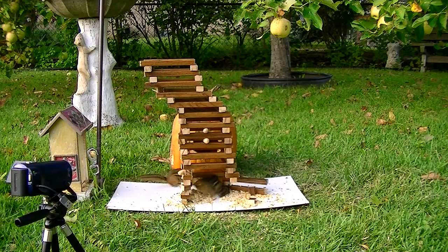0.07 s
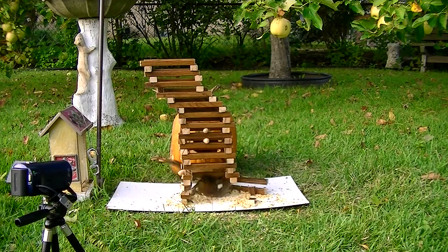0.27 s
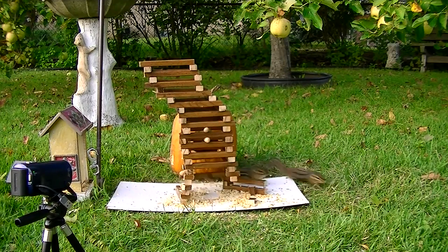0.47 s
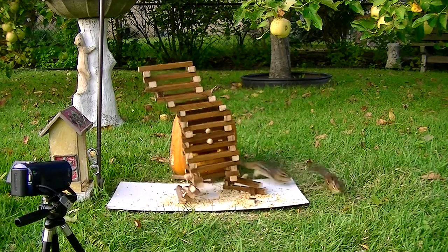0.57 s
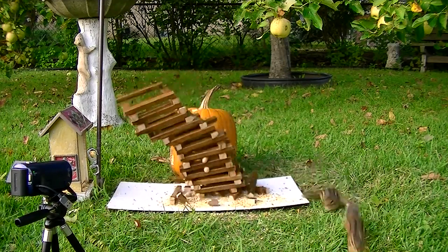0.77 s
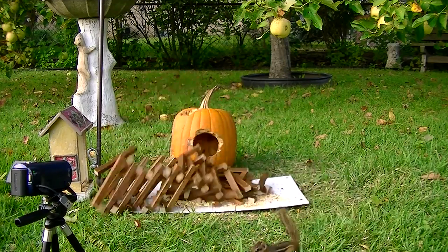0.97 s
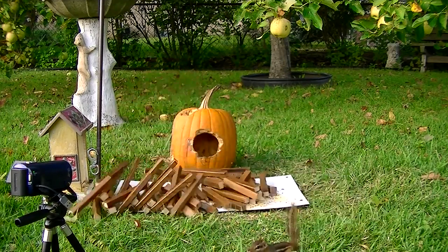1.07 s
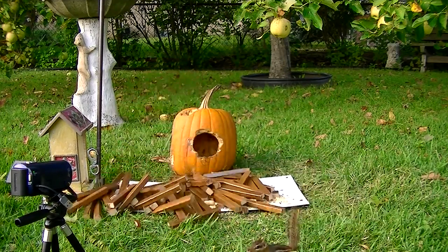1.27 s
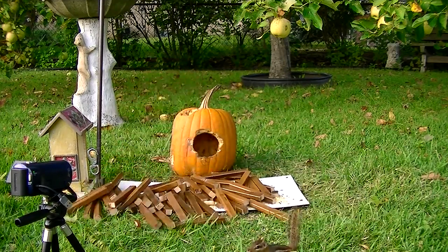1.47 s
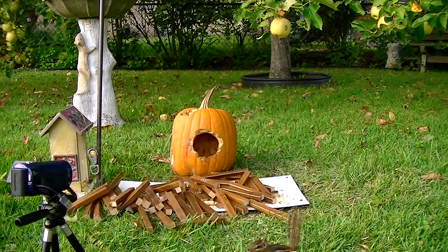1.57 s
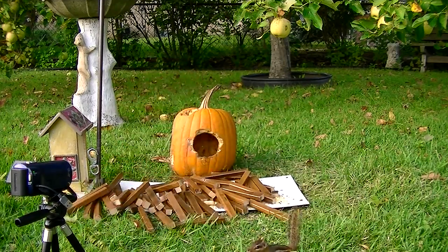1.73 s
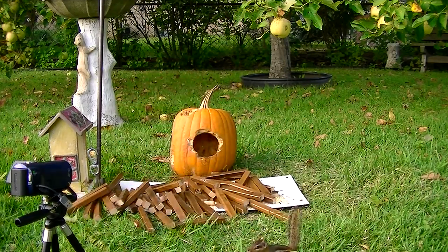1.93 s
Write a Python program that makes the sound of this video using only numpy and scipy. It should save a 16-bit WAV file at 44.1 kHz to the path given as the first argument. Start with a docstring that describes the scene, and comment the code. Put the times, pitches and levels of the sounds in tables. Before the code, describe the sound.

Wooden blocks clatter as a tower collapses on a lawn. Squirrels first scrabble through dry grass, then the blocks tumble densely, knocking and clinking, and settle in scattered knocks. The sound is slightly hollow over a faint outdoor hush.

```python
"""A dry rustle, then a dense wooden clatter that settles knock by knock.
Squirrels scrabble out from under a tower of wooden blocks on a lawn, and the tower topples.
Blocks knock on a board and on each other, clink as free bars and thump the ground.
A faint outdoor hush lies behind; one very short echo gives everything a hollow colour."""
import sys
import numpy as np
from scipy import signal
from scipy.fft import rfft, irfft
from scipy.io import wavfile

SR = 44100
rng = np.random.default_rng(int(sys.argv[2]) if len(sys.argv) > 2 else 0)


def file_out(sig):
    """Save sig as 16-bit WAV at sys.argv[1]."""
    # one column per channel
    cols = np.atleast_2d(sig).T
    # limit, then scale
    lim = np.clip(cols, -1, 1)
    pcm = np.round(lim * 32767).astype(np.int16)
    wavfile.write(sys.argv[1], SR, pcm)


N = 88200
T = np.arange(N) / SR
RING_T = np.arange(SR // 10) / SR

# Blocks landing. Each row: start in seconds, then thud, knock and crack levels in relative dB.
LANDINGS = [(0.381,-20.5,-20,-70),(0.428,-27.5,-33,-35),(0.466,-18.5,-28,-33.5),(.592,-32,-18.5,-57),(0.619,-30.5,-34,-48),(.677,-14.5,-27,-37),(0.685,-16,-21.5,-28),(.698,-18,-26,-18.5),(.709,-25,-57,-16.5),(.757,-23.5,-19.5,-36),(.765,-24,-22,-21.5),(.779,-42,-40,-23.5),(.790,-28,-31,-23.5),(0.832,-57,-32,-22),(0.867,-18,-21,-28.5),(.894,-40,-26.5,-21.5),(0.951,-43,-24.5,-27.5),(0.964,-21.5,-31,-41),(.977,-24,-37,-27.5),(0.985,-25,-19.5,-20),(.993,-36,-47,-12.5),(1.012,-24.5,-15.5,-28),(1.021,-26,-22,-19),(1.040,-31,-23,-24),(1.050,-18.5,-27,-24),(1.057,-38,-42,-18),(1.071,-57,-43,-15),(1.109,-69,-32,-36),(1.14,-56,-19,-23.5),(1.164,-31.5,-28.5,-37),(1.179,-35.5,-25.5,-28.5),(1.221,-25.5,-33,-31),(1.253,-27,-36,-26.5),(1.296,-28,-35,-30.5),(1.313,-27.5,-27,-61),(1.475,-35,-23.5,-71),(1.488,-55,-40,-24),(1.492,-24.5,-19.5,-28),(1.553,-33,-31,-62),(1.568,-22,-16.5,-41),(1.602,-17,-27,-40.5),(1.611,-32,-22.5,-38),(1.635,-21.5,-23,-49),(1.650,-34.5,-33,-44),(1.699,-30,-17.5,-28),(1.755,-38,-24,-48)]
# The tumbling mass. Each row: time in seconds, then knocking and ringing levels in relative dB.
TUMBLE_LEVELS = [(0.299,-44.5,-64),(.385,-31,-40),(.45,-36.5,-59),(.54,-48,-70),(0.671,-34.5,-39),(0.703,-16.5,-27.5),(0.739,-56,-27.5),(0.773,-23,-22),(.81,-42,-37),(.90,-33.5,-28.5),(.94,-34,-35.5),(1.0,-37,-26),(1.053,-19.5,-20),(1.15,-33.5,-23),(1.25,-30.5,-32.5),(1.319,-34.5,-32),(1.37,-38,-37.5),(1.44,-37,-41.5),(1.50,-34,-36),(1.57,-33,-40.5)]
# Spectrum of dry grass and leaves. Each row: frequency in Hz, level in dB.
GRASS_SPECTRUM = [(80,-40),(250,-6.5),(900,-10.5),(2500,-11),(4000,-13.5),(5500,-6.5),(7000,-14.5),(9500,-0.5),(12500,3),(14500,-6.5),(16500,-20.5)]

def from_db(db):
    """Decibels to gain."""
    return 10 ** (np.asarray(db) / 20)

def unit_rms(x):
    """Scale to unit rms."""
    return x / np.sqrt(np.mean(x ** 2) + 1e-20)

def curves(rows):
    """Interpolate each column after the time column, per sample."""
    times_s, *columns = np.transpose(rows)
    return [np.interp(T, times_s, column) for column in columns]

def coloured(x, spectrum):
    """Filter by (Hz, dB) points; unit rms."""
    hz, db = np.transpose(spectrum)
    grid_hz = np.linspace(1, SR / 2, N // 2 + 1)
    gain = from_db(np.interp(np.log(grid_hz), np.log(hz), db))
    return unit_rms(irfft(rfft(x) * gain, N))

def butter(x, hz, kind, order=2):
    """Butterworth filter."""
    return signal.sosfilt(signal.butter(order, hz, kind, fs=SR, output="sos"), x)

def low_noise(top_hz, n=N):
    """Low-passed noise; unit rms."""
    return unit_rms(butter(rng.standard_normal(n), top_hz, "low"))

def impulses(per_s, n=N):
    """True at random instants."""
    return rng.random(n) < per_s / SR

def decay(t60_s, t=RING_T):
    """Fall by 60 dB in t60_s."""
    return np.exp(-np.log(1000) * t / t60_s)

def add(out, start_s, sound):
    """Mix a sound in at start_s."""
    i = int(np.clip(start_s * SR, 0, N - 1))
    out[i:i + len(sound)] += sound[:N - i]

def mode(hz, db, t60_s):
    """One struck resonance."""
    return from_db(db) * np.sin(2 * np.pi * min(hz, SR / 2) * RING_T) * decay(t60_s)

def contact(ring, rebound, rebounds_per_s=1800):
    """One blow and a dying run of tiny rebounds share the energy of the ring."""
    n = len(RING_T)
    touches = impulses(rebounds_per_s, n) * rng.normal(0, rebound, n) * decay(t60_s=0.037)
    touches[0] = 1
    sound = signal.fftconvolve(touches, ring)[:n]
    return sound * np.linalg.norm(ring) / np.linalg.norm(sound)

def knock(bands_db, bands_hz=(444, 1280, 5700), detune=0.0593, spread_db=0.96):
    """A block damped by the pile: short modes, a little different at each blow."""
    # Each row: frequency in Hz, relative level in dB, T60 in seconds.
    pile_modes = [(313,-6.5,0.031),(402,-1.5,0.029),(549,1,0.024),(813,4,0.012),(1029,1,0.014),(1280,-0.5,0.015),(1552,0,0.015),(1852,-2.5,0.024),(2372,-4.5,0.028),(3220,-2,0.017),(4420,-6,.012),(5080,-2,0.0089),(5904,-8,0.034),(8030,-5.5,0.016),(10250,-4.5,0.025)]
    ring = np.zeros(len(RING_T))
    for k, (hz, db, t60_s) in enumerate(pile_modes):
        struck_hz = hz * (1 + detune * rng.normal())
        blow_db = np.interp(np.log(hz), np.log(bands_hz), bands_db) + rng.normal(0, spread_db)
        ring += (-1) ** k * mode(struck_hz, db + blow_db, t60_s)
    return contact(ring, rebound=0.2)

def clink(hz, overtone_db, detune=0.025):
    """A block ringing as a free bar: a bending mode and its overtones."""
    # Each row: frequency ratio, relative level in dB, T60 in seconds.
    bar_modes = [(1,-0.5,0.052),(1.9,-14,0.018),(2.37,-4.5,0.053),(3.95,-13,0.032)]
    ring = np.zeros(len(RING_T))
    for ratio, db, t60_s in bar_modes:
        is_overtone = ratio > 1
        mode_hz = hz * ratio * (1 + is_overtone * detune * rng.normal())
        ring += mode(mode_hz, db + is_overtone * overtone_db, t60_s)
    return contact(ring, rebound=0.075)

def blocks(knock_gain_db=2, clink_gain_db=-2):
    """Loud single contacts: blocks land, loose ones ring."""
    # Each row: start in seconds, relative level in dB, pitch in Hz, overtone gain in dB.
    clinks = [(0.593,-25.5,3020,-13),(.645,-24,2660,-16),(0.702,-27,2600,6),(.721,-32,2350,3),(0.764,-25,2590,10.5),(0.785,-29,2417,10.5),(0.833,-20.5,2345,-9),(.893,-24,2200,-1),(0.913,-23.5,2476,-5),(.952,-26.5,2730,4.5),(0.978,-27,2380,-13),(1.013,-13.5,2556,-2),(1.041,-15.5,2390,-15),(1.062,-16,2736,0),(1.086,-23,2637,9.5),(1.109,-18,3270,4.5),(1.115,-15.5,2610,-1.5),(1.14,-14,2816,-34),(1.146,-16.5,2457,-0.5),(1.180,-14.5,3360,-17),(1.212,-19.5,2390,-8),(1.231,-16.5,2593,-23),(1.253,-15.5,2681,0.5),(1.283,-26,3520,-25),(1.314,-22.5,2430,-16),(1.335,-28,3440,-42),(1.374,-30.5,3150,-22),(1.388,-17,3370,-21),(1.417,-22,2573,-8),(1.399,-24.5,4730,-11),(1.442,-21.5,2600,-10.5),(1.471,-26,2640,-35),(1.488,-18.5,2534,0),(1.511,-24.5,2670,-34),(1.552,-27.5,3367,-27),(1.700,-27.5,2690,-18),(1.7567,-23.5,2370,-18),(1.861,-31.5,2420,-35)]
    out = np.zeros(N)
    for start_s, *bands_db in LANDINGS:
        add(out, start_s, from_db(knock_gain_db) * knock(bands_db))
    for start_s, db, hz, overtone_db in clinks:
        add(out, start_s, from_db(db + clink_gain_db) * clink(hz, overtone_db))
    return out

def tumble(knocks_per_s=400, clinks_per_s=320, spread_db=1.5, detune=0.0304):
    """Many small random contacts while the tower shifts and falls."""
    # Each entry: a block's first bending mode in Hz.
    pitches_hz = [2104,2344,2462,2720,2662,2859,2974,3364]
    knocks, clinks = np.zeros((2, N))
    start_s, end_s = TUMBLE_LEVELS[0][0], TUMBLE_LEVELS[-1][0]
    dull_bands_db = np.array([0, 0, -17])
    for slot_s in np.arange(start_s, end_s, 1 / knocks_per_s):
        hit_s = slot_s + rng.random() / knocks_per_s
        add(knocks, hit_s, rng.choice([-1, 1]) * knock(dull_bands_db + rng.normal(0, spread_db)))
    for slot_s in np.arange(start_s, end_s, 1 / clinks_per_s):
        hz = rng.choice(pitches_hz) * (1 + detune * rng.normal())
        hit_s = slot_s + rng.random() / clinks_per_s
        add(clinks, hit_s, from_db(rng.normal(0, spread_db)) * clink(hz, overtone_db=-11))
    knock_db, clink_db = curves(TUMBLE_LEVELS)
    return from_db(knock_db - 7) * unit_rms(knocks) + from_db(clink_db - 6.5) * unit_rms(clinks)

def scuffs(scuff_gain_db=-6, grit_gain_db=-12):
    """Edges scuff as they land; fine clicks fill the tumble."""
    # Each row: frequency in Hz, level in dB.
    scuff_spectrum = [(800,-10.5),(2600,4),(3900,-0.5),(5800,4.5),(7200,-10.5),(10500,-4.5),(13000,-10),(16500,-25)]
    envelope = np.zeros(N)
    for start_s, _, _, crack_db in LANDINGS:
        add(envelope, start_s, from_db(crack_db + scuff_gain_db) * decay(t60_s=0.049))
    _, ringing_db = curves(TUMBLE_LEVELS)
    envelope += from_db(ringing_db + grit_gain_db) * (T < TUMBLE_LEVELS[-1][0])
    grit = impulses(per_s=12000) * rng.standard_normal(N)
    return envelope * coloured(grit, scuff_spectrum)

def rustle(gain_db=0.5, grain_spread_db=3, clump_db=2.5):
    """Dry grass and leaves crackle: clumps of bright grains, scrabbling strokes, a few snaps."""
    # Each row: time in seconds, relative level in dB.
    rustle_levels = [(0,-53),(.05,-46),(.14,-42.5),(.205,-40.5),(.285,-37.5),(.302,-41),(.345,-33),(.40,-30.5),(.50,-28),(.545,-35),(.60,-31),(.64,-42),(.72,-25),(.75,-39.5),(.785,-37),(.82,-46.5),(.835,-40),(.93,-49),(1.0,-44),(1.08,-36),(1.19,-46),(1.45,-69),(1.6,-52),(1.8,-66)]
    # Strokes that swell and stop. Each row: start in seconds, length in seconds, final level in dB.
    strokes = [(0.147,0.024,-44),(0.21,0.019,-29),(0.23,0.025,-26.5),(0.272,.021,-23.5),(0.475,.018,-25),(.524,.009,-21),(0.613,0.011,-25),(0.718,0.0059,-25),(1.063,0.02,-27.5)]
    # Each row: start in seconds, level in dB, T60 in seconds.
    snaps = [(0.273,-11,0.0056),(.315,-24.5,0.045),(0.327,-18.5,0.0092),(0.3639,-21.5,0.011),(0.394,-14.5,0.007),(.411,-20,.006),(0.473,-14,0.012),(0.516,-22,.008),(0.597,-17.5,0.0089),(0.612,-31,.006),(1.111,-16,0.014),(1.143,-26,.01),(1.541,-31.5,0.0059),(1.593,-32,.008),(1.638,-30.5,.008),(1.680,-30.5,0.014)]
    grains = impulses(per_s=5000) * rng.choice([-1, 1], N)
    grains = grains * from_db(grain_spread_db * np.minimum(rng.exponential(1, N), 4))
    level_db, = curves(rustle_levels)
    envelope = from_db(level_db + gain_db + clump_db * low_noise(top_hz=90))
    for start_s, length_s, db in strokes:
        add(envelope, start_s, from_db(db) * np.linspace(0.13, 1, int(length_s * SR)))
    snap_envelope = np.zeros(N)
    for start_s, db, t60_s in snaps:
        add(snap_envelope, start_s, from_db(db) * decay(t60_s))
    snapping = snap_envelope * coloured(rng.standard_normal(N), GRASS_SPECTRUM)
    return envelope * coloured(grains, GRASS_SPECTRUM) + snapping

def ground_thumps(top_hz=134):
    """Soft low thumps where the weight comes down."""
    # Each row: start in seconds, level in dB.
    thumps = [(0.675,-41.5),(0.766,-53),(.868,-58),(.98,-51),(1.048,-59),(1.488,-61),(1.57,-59)]
    out = np.zeros(N)
    for start_s, db in thumps:
        add(out, start_s, from_db(db) * low_noise(top_hz, len(RING_T)) * decay(t60_s=0.1))
    return out

def groan(roughness=0.63):
    """A block drags as the base gives way: a short, low, sinking tone."""
    # Each row: time in seconds, pitch in Hz, level in dB.
    drag = [(.525,253,-44),(.545,237,-41.5),(.575,222,-41),(.592,208,-47),(.61,180,-56)]
    hz, db = curves(drag)
    waver = 1 + roughness * low_noise(top_hz=63)
    dragging = (T > drag[0][0]) & (T < drag[-1][0])
    return from_db(db) * waver * np.sin(2 * np.pi * np.cumsum(hz) / SR) * dragging

def grass_ticks(gain_db=-39.5, end_s=1.75):
    """Stray faint ticks of dry grass."""
    onsets = impulses(per_s=70) * rng.uniform(0.3, 1.8, N) * (T < end_s)
    envelope = signal.fftconvolve(onsets, decay(t60_s=0.0039))[:N]
    return from_db(gain_db) * envelope * coloured(rng.standard_normal(N), GRASS_SPECTRUM)

def garden_reverb(x, gain_db=-21.5, t60_s=0.58, top_hz=3780, delay_s=0.012):
    """A faint dull tail from hedges and trees."""
    t = T[:SR // 2]
    tail = butter(rng.standard_normal(len(t)), top_hz, "low") * decay(t60_s, t) * (t > delay_s)
    return from_db(gain_db) * signal.fftconvolve(x, tail / np.linalg.norm(tail))[:N]

def hush(air_db=-46, air_top_hz=6500, hiss_db=-55):
    """Steady outdoor background and a thin hiss."""
    # Each row of both: frequency in Hz, level in dB.
    air_spectrum = [(25,-63),(60,-48),(110,-6),(160,-11.5),(230,-8),(330,-10.5),(600,-10),(950,-7),(1600,-11),(2500,-17.5),(4000,-23.5),(5500,-23),(7000,-66)]
    hiss_spectrum = [(5000,-6),(7200,-9),(8800,-0.5),(10500,-13),(16000,-11.5)]
    air = butter(coloured(rng.standard_normal(N), air_spectrum), air_top_hz, "low")
    hiss = coloured(rng.standard_normal(N), hiss_spectrum)
    return from_db(air_db) * air + from_db(hiss_db) * hiss

def scene():
    """Background, grass and wood in mono; small blocks radiate little bass."""
    background = hush()
    grass = butter(rustle() + grass_ticks(), hz=163, kind="high")
    lows = ground_thumps() + groan()
    wood = butter(blocks() + tumble() + scuffs(), hz=205, kind="high", order=3)
    return (wood + garden_reverb(wood) + grass + lows + background)[None]

def record(dry, echo_s=0.003764, echo_gain=0.8, echo_top_hz=8000, cutoff_hz=16200):
    """A very short low-passed echo combs the sound; the highest treble is cut."""
    hz = np.linspace(0, SR / 2, N + 1)
    echo = echo_gain / (1 + (hz / echo_top_hz) ** 8) * np.exp(-2j * np.pi * hz * echo_s)
    comb = (1 + echo) / np.sqrt(1 + abs(echo) ** 2)
    combed = irfft(rfft(dry, 2 * N) * comb)[:, :N]
    return butter(combed, cutoff_hz, "low", order=40)

dry = scene()
out = record(dry)
file_out(out)
```